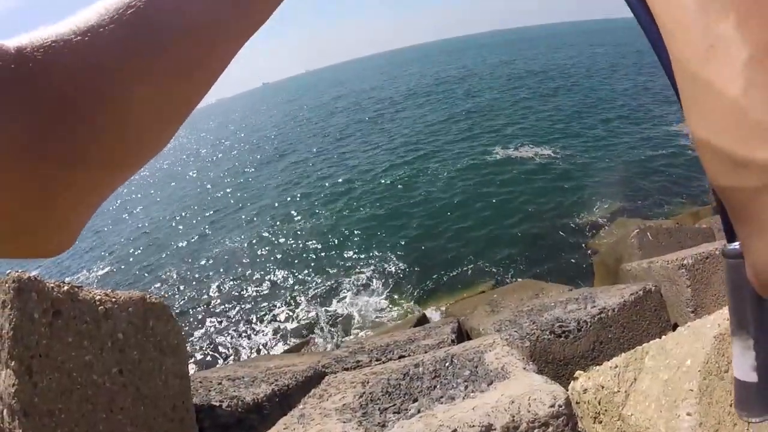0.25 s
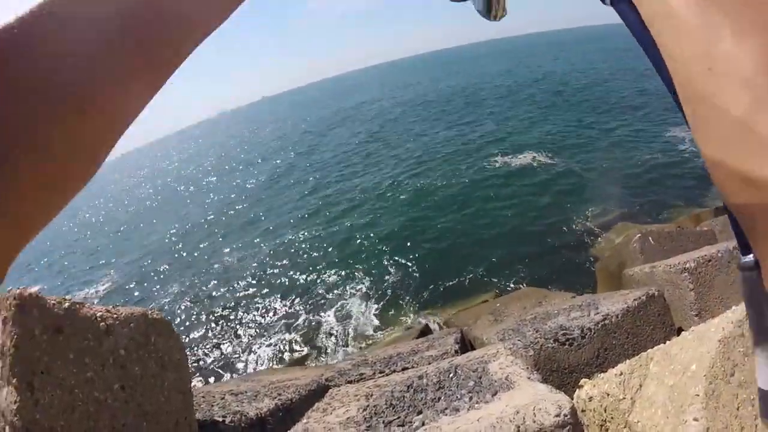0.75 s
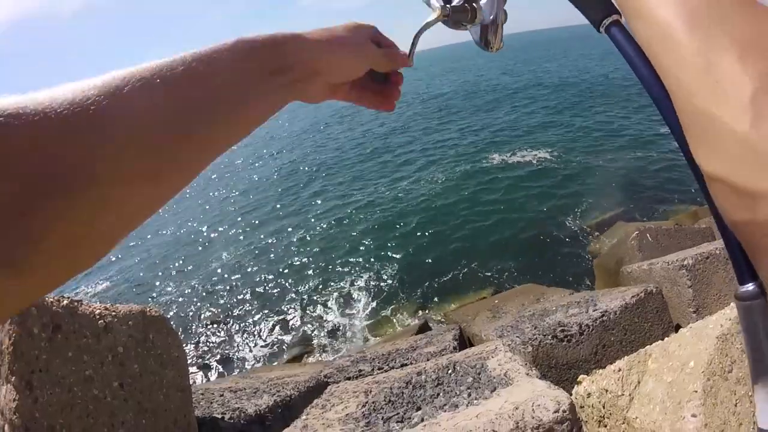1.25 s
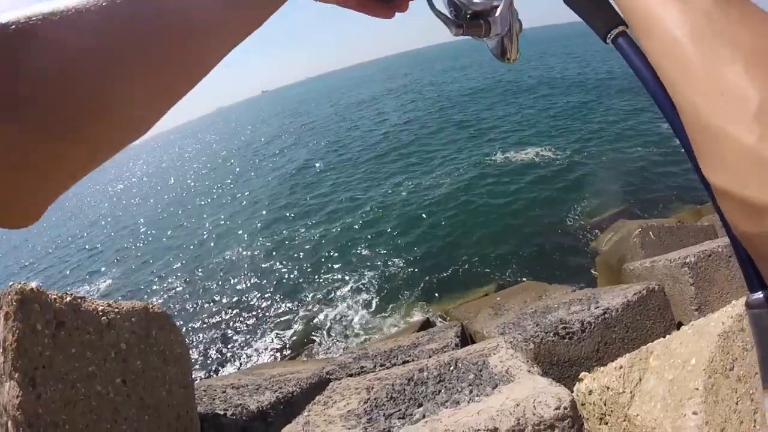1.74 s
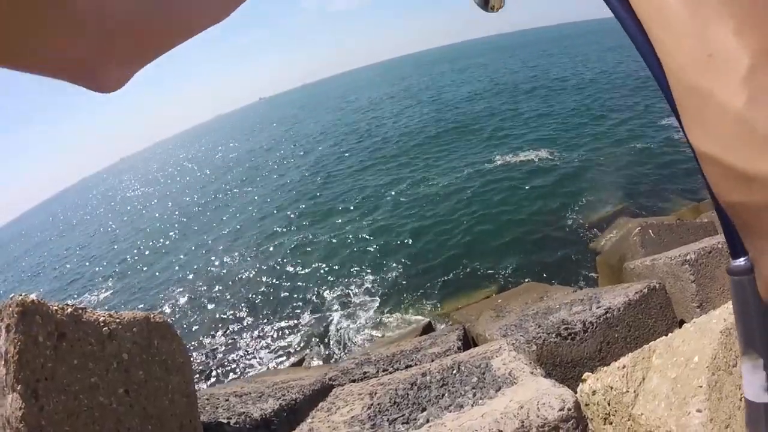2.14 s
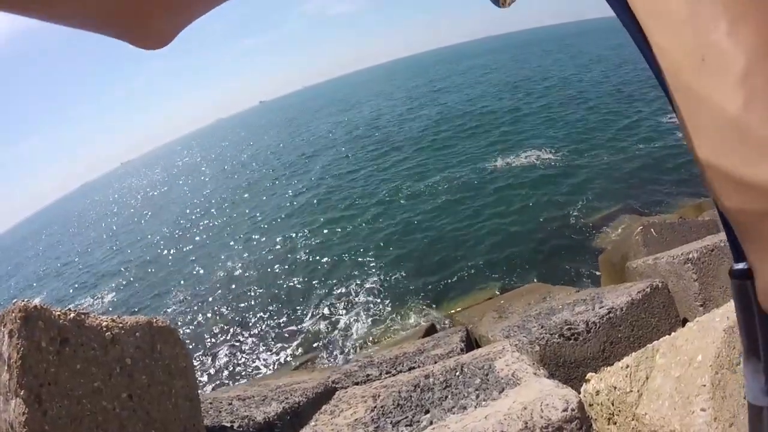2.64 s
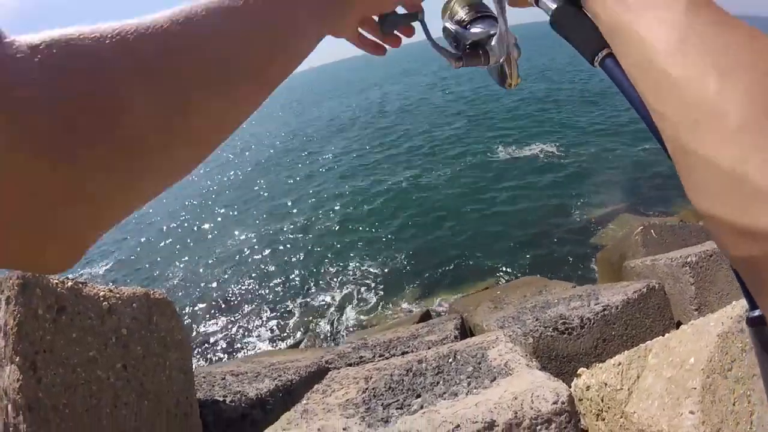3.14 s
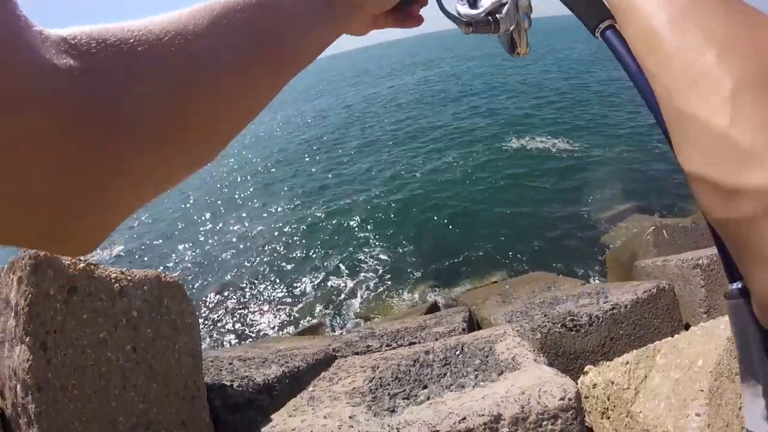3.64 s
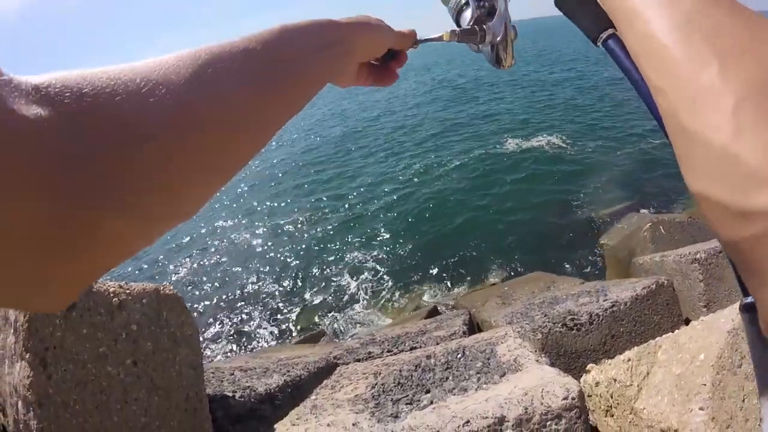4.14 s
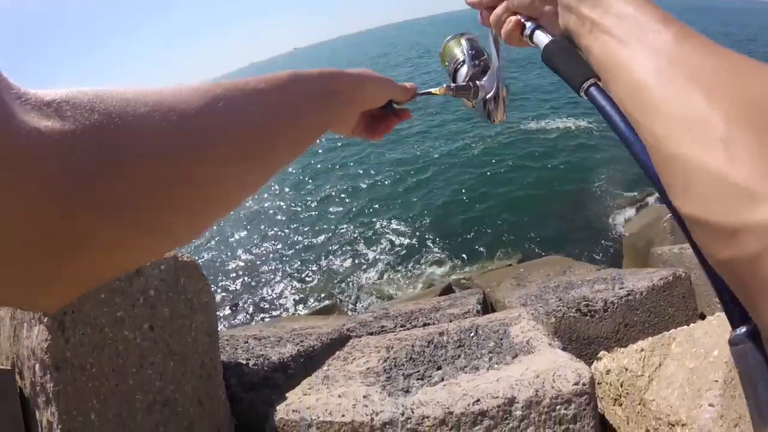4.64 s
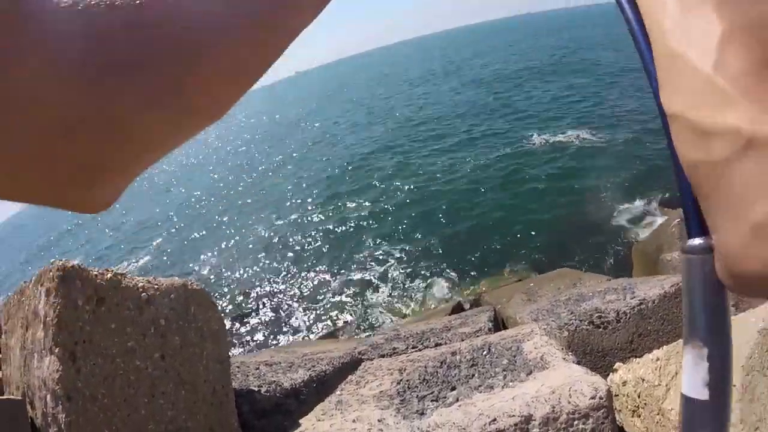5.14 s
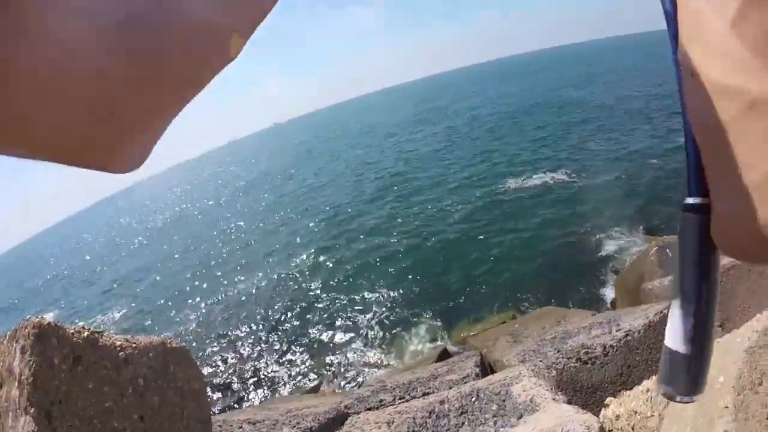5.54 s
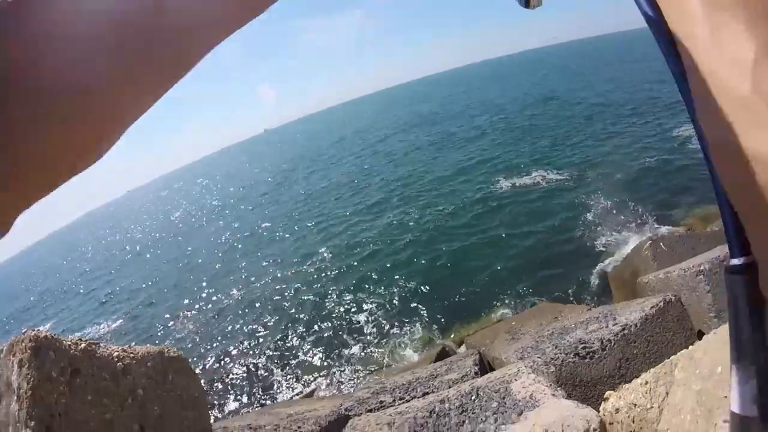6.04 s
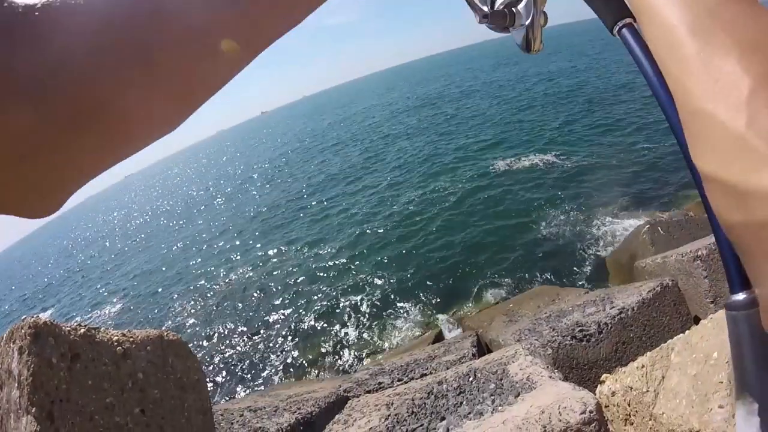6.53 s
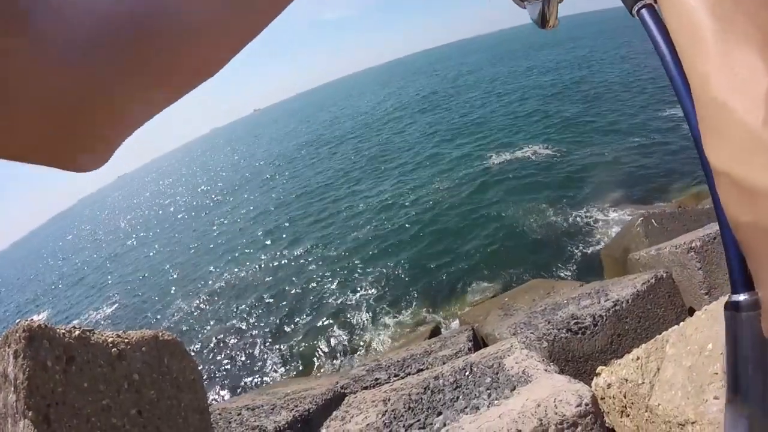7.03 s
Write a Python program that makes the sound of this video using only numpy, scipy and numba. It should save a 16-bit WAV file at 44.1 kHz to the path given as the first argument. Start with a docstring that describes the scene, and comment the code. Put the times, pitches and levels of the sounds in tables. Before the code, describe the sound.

Wavelets splash and slap on concrete, gusts buffet a body-worn microphone, and line pulled from a reel gives dry metallic clicks and brief whirring runs.

```python
"""Swell washes among the concrete blocks of a breakwater: noise and bubble clouds ride a slow swell, with
splashes, slaps, plops, small knocks, spatters and drops on top. Wind buffets a body-worn camera as gust-shaped
low noise. As line is pulled out, the drag of a fishing reel ticks and buzzes: ringing modes and a noise crack
per click. A boat engine drones far away and the camera's electronics whine, both as wavering sines.
The camera case adds resonances to most of the water."""
import sys
import numpy as np
from scipy import signal
from scipy.fft import rfft, irfft
from scipy.io import wavfile
from scipy.ndimage import uniform_filter1d
from numba import njit

SR = 44100
rng = np.random.default_rng(int(sys.argv[2]) if len(sys.argv) > 2 else 0)


def wrap_up_sound(samples):
    """Save the sound to the file named by the first command line argument, as 16-bit audio."""
    columns = np.atleast_2d(samples).T
    # keep every value between -1 and 1, then stretch to whole-number steps
    tamed = np.clip(columns, -1, 1)
    steps = np.round(tamed * 32767).astype(np.int16)
    wavfile.write(sys.argv[1], SR, steps)


N = 321048
TIME = np.arange(N) / SR  # s

# Table levels are starting points: the functions trim, scatter or colour them further.

# slow swell of the wash: [start_s, level_db, gurgle_db and spray_db relative to the wash]
SWELL = [(0, -47, -3, -10.5), (0.35, -49.5, -2, -8.5), (0.65, -48.5, -1, -8.5), (1.25, -52.5, 1.5, -4),
         (1.75, -49.5, -1.5, -7.5), (2.3, -54, 0.5, -8.5), (2.85, -49.5, -3.5, -10.5), (3.2, -50.5, -1, -8),
         (3.8, -49.5, -3, -7.5), (4.5, -47, -3, -8), (4.75, -44, -4, -12.5), (5.08, -46.5, -3, -8),
         (5.38, -47, -2.5, -9.5), (5.58, -45.5, 0.5, -6.5), (6.3, -43, -5.5, -8), (6.7, -45, -0.5, -9),
         (7.28, -45.5, -1, -12.5)]
# wavelets breaking on the blocks: [crest_s, lift_db over the swell, fall_s]
SPLASHES = [(.12, 4, 0.081), (.58, 3, 0.13), (.92, 4, 0.054), (1.5, 0, 0.039), (2.618, 1.5, 0.041),
            (3.03, 4, 0.02), (3.36, 2, 0.087), (3.67, 3.5, 0.067), (4.12, 1.5, 0.038), (4.65, 3, 0.08),
            (4.77, 1, 0.058), (4.939, 4, 0.04), (5.481, 2, 0.068), (6.6, 3.5, 0.11), (6.75, -0.5, 0.029),
            (7.1, 3, 0.044)]
SPLASH_RISE_S = 0.038
# outline of the water's spectrum: [frequency_hz, level_db per Hz]
WATER_SPECTRUM = [(90, 9.5), (250, 3.5), (550, 3.5), (900, 0), (1400, 0), (1650, -7), (2150, -13.5),
                  (3300, -12.5), (4000, -22), (6000, -20.5), (7200, -22), (10500, -31.5), (13200, -36.5),
                  (14500, -58)]
# resonances of the camera case: [centre_hz, width_hz, lift_db]
CASE_RESONANCES = [(1413, 270, 2.5), (1804, 160, 6), (2465, 280, 3.5), (2976, 146, 6), (3540, 194, 5),
                   (4340, 280, 1.5), (5170, 550, 3), (6400, 210, 3)]
# droplets pattering back on the blocks: [start_s, level_db]
PATTER = [(0, -59.5), (2.6, -59), (4.5, -57), (4.95, -57), (5.3, -59.5), (6.05, -72.5), (6.35, -60),
          (6.7, -55), (7.0, -59), (7.28, -59)]
# steady roar of the open sea: [frequency_hz, level_db per Hz]
ROAR_SPECTRUM = [(35, -4.5), (62, 0), (90, -3.5), (130, -6.5), (200, -10.5), (400, -21), (1000, -67)]

# gusts on the microphone: [peak_s, half_length_s, buffet_db, rumble_db]
GUSTS = [(0.0, 0.077, -23, -43), (0.546, 0.055, -12.5, -39), (0.72, 0.1, -19.5, -45),
         (0.945, 0.048, -19, -50), (1.55, 0.067, -31.5, -40), (1.344, 0.12, -19, -39.5),
         (1.91, 0.039, -36, -45), (2.352, 0.06, -28.5, -40.5), (2.543, 0.048, -28.5, -39.5),
         (2.793, 0.043, -32, -36.5), (3.15, 0.047, -27.5, -38), (3.41, 0.11, -20.5, -52),
         (3.989, 0.12, -22, -47), (4.27, 0.14, -27.5, -43.5), (4.67, 0.2, -24, -55),
         (4.967, 0.14, -29, -42.5), (5.743, 0.15, -21.5, -47), (5.939, 0.069, -12.5, -39),
         (6.117, 0.12, -16, -42), (6.34, 0.089, -19, -44), (6.582, 0.11, -33.5, -43),
         (7.06, 0.044, -36, -46)]
BREEZE_DB, RUMBLE_FLOOR_DB = -35, -47.5  # between the gusts
# slow sway of the air: [frequency_hz, level_db per Hz]
SWAY_SPECTRUM = [(5, -19), (9, -11), (12.7, 12.5), (19, -5.5), (30, -33)]
# dull thud riding on the sway: [frequency_hz, level_db per Hz]
THUD_SPECTRUM = [(14, -24), (21, -2), (30, -4.5), (45, -33), (70, -54), (120, -54), (300, -66)]
# rumble of the smaller eddies: [frequency_hz, level_db per Hz]
RUMBLE_SPECTRUM = [(20, -33), (36, -1), (55, -7), (80, -7.5), (120, -27.5), (250, -34), (600, -39.5)]
THUD_DB_PER_OCTAVE = 4.5  # the shorter a gust, the harder it thuds
THUD_HALF_S = 0.1  # half length of a gust whose thud gets no lift

# whine of the camera's electronics: [pitch_hz, level_db]
WHINE = [(9593, -81.5), (9652, -72.5)]

# plops, small knocks and sharp spatters: [start_s, starting pitch_hz, peak_db, t60_s]
PLOPS_AND_KNOCKS = [(0.404, 1280, -38, 0.014), (.580, 3000, -38, 0.016), (1.476, 1360, -33, 0.014),
                    (2.627, 1292, -35, 0.0079), (2.852, 740, -46, .04), (2.908, 598, -43, .06),
                    (3.36, 1360, -39.5, .03), (3.013, 399, -45, 0.062), (3.028, 604, -42, 0.05),
                    (3.044, 810, -43, 0.032), (3.442, 330, -42, 0.037), (3.466, 264, -33.5, 0.067),
                    (3.488, 220, -38, 0.078), (4.028, 1180, -34, 0.014), (4.748, 900, -36, 0.045),
                    (4.93, 3060, -41, 0.015), (6.106, 306, -30, 0.039), (6.3, 415, -39, 0.067),
                    (6.656, 3430, -43, 0.011), (6.749, 1330, -40, 0.027), (7.039, 440, -38, 0.039),
                    (7.074, 1336, -36, 0.034), (7.148, 843, -34.5, 0.033)]

# single drag clicks while the spool slips tooth by tooth: [start_s, crack_db, ring_db, snap_db]
TICKS = [(0.411, -40, -61, -50), (0.4554, -37, -53, -48), (0.4913, -36, -45, -48), (0.5172, -32, -41, -47),
         (0.5402, -41, -54, -55), (0.5606, -39, -51, -53), (0.5771, -41, -56, -46), (0.6075, -44, -61, -56),
         (0.632, -42, -61, -51), (0.6619, -38, -54, -48), (0.6853, -45, -56, -60), (0.7168, -45, -57, -56),
         (0.7517, -41, -56, -57), (0.7826, -36, -53, -58), (0.8395, -39, -51, -58), (0.8744, -41, -53, -51),
         (0.9073, -35, -44, -47), (0.9358, -40, -55, -51), (0.9627, -37, -51, -54), (0.9852, -35, -46, -49),
         (1.0056, -39, -53, -48), (1.0301, -33, -48, -48), (1.063, -38, -45, -54), (1.0889, -27, -50, -58),
         (1.1099, -39, -60, -55), (1.1323, -34, -53, -55), (1.1672, -41, -53, -57), (1.1992, -38, -55, -51),
         (1.5974, -38, -55, -55), (1.9889, -40, -58, -57), (2.2897, -39, -55, -54), (2.6444, -35, -56, -49),
         (3.1263, -39, -52, -55), (3.2176, -46, -60, -62), (3.9828, -40, -58, -55), (4.0412, -46, -55, -66),
         (4.2832, -37, -50, -63), (4.8489, -46, -59, -60), (4.9028, -44, -54, -62), (5.0574, -46, -54, -67),
         (5.1876, -47, -61, -60), (5.3617, -44, -54, -62), (5.5967, -41, -48, -74), (5.7568, -35, -37, -46),
         (5.7927, -34, -41, -55), (5.8371, -40, -52, -63), (6.0222, -37, -50, -48), (6.1, -38, -57, -47),
         (6.5013, -45, -57, -63)]
# runs of drag clicks: [start_s, fastest_s, end_s,
# clicks per s at the start, at the fastest moment, at the end, ring_db, snap_db, crack_db, rattle_db]
# rattle_db is added to snap and crack around the fastest moment
CLICK_RUNS = [(1.217, 1.333, 1.518, 46, 120, 41, -52.5, -54.5, -33, 5),
              (1.608, 1.702, 1.793, 69, 78, 66, -47.5, -61, -34.5, 7),
              (2.876, 2.952, 3.014, 32, 72, 38, -66, -60, -33.5, 1),
              (3.71, 3.773, 3.805, 33, 64, 60, -50.5, -58, -31, 4.5),
              (3.821, 3.862, 3.951, 76, 78, 36, -48, -53, -29, 0),
              (4.11, 4.22, 4.243, 13, 40, 39, -48.5, -57, -38, -3),
              (4.295, 4.379, 4.45, 70, 116, 116, -39.5, -65, -37, 10),
              (4.46, 4.484, 4.522, 89, 108, 89, -36.5, -70, -39, 0),
              (4.528, 4.583, 4.635, 99, 130, 95, -37, -69, -33, 2),
              (4.649, 4.683, 4.767, 50, 59, 10.5, -40.5, -66, -35, 1),
              (5.611, 5.69, 5.731, 22, 55, 55, -48.5, -58, -41, 5),
              (6.216, 6.291, 6.38, 20, 38, 25, -55, -55.5, -32, 6)]
FORCE_DB_PER_OCTAVE = 1.5  # a faster spool strikes the pawl harder
RATTLE_S = 0.02  # half length of the fastest moment of a run
# modes of the reel: [pitch_hz, level_db, t60_s, snap share 0-1; the ring drives the rest]
REEL_MODES = [(4490, 0, 0.0083, 0.57), (5130, 4.5, 0.0038, 0.22), (6650, 8.5, 0.0056, 0.43),
              (7290, 2, 0.017, 0.16), (7390, -2, 0.014, 0.05), (8100, 5.5, 0.0042, 0.8),
              (9640, -5.5, 0.01, 0.77), (12820, 7, 0.0063, 1), (13470, -1, 0.006, 0.95)]
# slow drift of the snap's pitch: [start_s, shift as a fraction]
SNAP_SHIFT = [(.5, 0.019), (1.4, 0.028), (2.0, .004), (3.8, -0.0032), (5.7, 0.015), (6.05, .018),
              (6.3, -0.0012)]
RING_RISE_S, SNAP_RISE_S, SCRAPE_T60_S = 0.0012, 0.0007, 0.0045
RING_DETUNE = 0.003  # random pitch spread, as a fraction
# spectrum of the pawl's crack: [frequency_hz, level_db per Hz]
CRACK_SPECTRUM = [(2500, -25), (3900, -12), (4450, 8), (4750, -1), (5250, 7.5), (6000, -1), (6600, 2),
                  (8600, 6), (11000, -15.5), (12900, -4), (15000, -24)]

# water slapping flat against concrete: [start_s, level_db, t60_s, lowest_hz, highest_hz]
SLAPS = [(0.603, -45, .02, 1600, 2800), (4.123, -41, 0.045, 230, 1100), (4.618, -42, 0.061, 500, 1500),
         (4.775, -38, 0.12, 400, 1397), (4.921, -39.5, 0.13, 400, 3400), (4.98, -46, .16, 1350, 3500),
         (5.468, -38, 0.05, 400, 2100), (6.116, -38, 0.081, 260, 1000), (6.665, -41.5, 0.074, 600, 1900),
         (6.742, -37.5, 0.1, 1210, 1900)]
SLAP_RISE_S = 0.0032

# big drops landing on the concrete: [start_s, level_db, t60_s]
DROPS = [(5.827, -34, 0.0075), (6.133, -48, .014), (6.608, -49, .02), (6.656, -42, .012),
         (6.752, -45, .035), (6.828, -44, .012), (6.919, -42, 0.015), (6.982, -38.5, .009),
         (7.078, -50, .025)]
# spectrum of a drop's splat: [frequency_hz, level_db per Hz]
DROP_SPECTRUM = [(1200, -20), (2400, 3), (3400, 8), (4200, -14), (5300, 0), (6800, -3), (9000, -27),
                 (14000, -35)]

TOP_HZ = 15100  # upper limit of the camera's sound


def undb(db):
    """Decibels to gain."""
    return 10 ** (np.asarray(db) / 20)


def unit(x):
    """Scale to rms 1."""
    return x / np.sqrt(np.mean(x ** 2))


def clock(length_s_inverse):
    """Time axis in seconds for a sound lasting 1 / length_s_inverse s."""
    return np.arange(SR // length_s_inverse) / SR


def decay(t, t60):
    """Exponential decay that falls 60 dB in t60 seconds."""
    return np.exp(-np.log(1000) * t / t60)


def soft_rise(t, rise_s):
    """Onset that starts from rest and builds over about rise_s."""
    return 1 - np.exp(-(t / rise_s) ** 2)


def curves(table):
    """Columns of a (start_s, ..) table, interpolated sample by sample."""
    s, *columns = np.transpose(table)
    return [np.interp(TIME, s, c) for c in columns]


def colour(x, points, peaks=()):
    """Filter by a (frequency_hz, level_db) outline with resonant peaks on top."""
    f = np.maximum(np.arange(len(x) // 2 + 1) * SR / len(x), 1)
    hz, db = np.transpose(points)
    shape = np.interp(np.log(f), np.log(hz), db)
    for centre, width, lift in peaks:
        shape = shape + lift / (1 + (2 * (f - centre) / width) ** 2)
    return irfft(rfft(x) * undb(shape), len(x))


def band(x, lo_hz, hi_hz):
    """Band-pass."""
    return signal.sosfilt(signal.butter(4, [lo_hz, hi_hz], "band", fs=SR, output="sos"), x)


def below(x, hz):
    """Low-pass without delay, so that the rest is the matching high-pass."""
    return signal.sosfiltfilt(signal.butter(2, hz, fs=SR, output="sos"), x)


def walk(rate):
    """Random levels of rms 1, held for 1 / rate s and smoothed twice."""
    hold = int(SR / rate)
    steps = np.repeat(rng.standard_normal(N // hold + 1), hold)
    smooth = uniform_filter1d(uniform_filter1d(steps, hold), hold)
    return unit(smooth[:N])


def add(out, s, sound):
    """Mix a sound in at time s."""
    i = int(np.clip(s * SR, 0, N - 1))
    out[i:i + len(sound)] += sound[:N - i]


@njit
def bubbles(start, hz, cycles, size, rise):
    """Each bubble rings for some cycles and rises in pitch as it nears the surface."""
    out = np.zeros(N)
    for k in range(len(start)):
        n, phase = int(cycles[k] * SR / hz[k]), 0.
        gain, fade = size[k], np.exp(-5 / n)
        for i in range(min(n, N - start[k])):
            phase += 2 * np.pi * hz[k] / SR * (1 + rise * i / n)
            gain *= fade
            out[start[k] + i] += gain * np.sin(phase)
    return out


def froth(count, lo_hz, hi_hz, cycles, spread_db):
    """A cloud of bubbles at random times: small, high ones outnumber large ones, and levels scatter."""
    when, pitch, life, size = rng.random((count, 4)).T
    hz = lo_hz * (hi_hz / lo_hz) ** np.sqrt(pitch)
    scatter_db = spread_db * np.minimum(-np.log(1 - size), 4)
    gain = undb(scatter_db) * hz / np.sqrt(np.sqrt(pitch) + 0.18)  # balances the spectrum
    return bubbles((when * N).astype(np.int64), hz, cycles * (0.5 + life), gain, 0.35)


def splash_lift():
    """Decibels by which breaking wavelets shift the wash: a quick rise and a slower fall."""
    return sum(db * np.exp(-np.maximum((s - TIME) / SPLASH_RISE_S, (TIME - s) / fall_s))
               for s, db, fall_s in SPLASHES)


def sea(foam_db=0, bubble_db=-7, flicker_db=1.14, gurgle_db=-0.87, spray_db=8.5, sea_db=-0.5, lap_db=0.19):
    """Foam hiss and bubbles swell with each wave; low gurgle and high spray vary along with it."""
    swell_db, gurgle, spray = curves(SWELL)
    wash_db = swell_db + splash_lift() + lap_db * walk(9)
    cloud = unit(froth(count=7000, lo_hz=171.7, hi_hz=4945, cycles=12.5, spread_db=1.5))
    foam = undb(foam_db) * rng.standard_normal(N)
    water = colour(foam + undb(bubble_db) * cloud, WATER_SPECTRUM, CASE_RESONANCES)
    water = water / np.std(band(water, 700, 1900))  # the middle of the wash sets its level
    low, not_high = below(water, 830), below(water, 1820)
    low_part = low * undb(gurgle + gurgle_db)
    middle_part = not_high - low
    high_part = (water - not_high) * undb(spray + spray_db)
    # each part flickers on its own
    flickering = sum(part * undb(flicker_db * walk(35)) for part in (low_part, middle_part, high_part))
    return flickering * undb(wash_db + sea_db)


def splashlets(count=260, splashlet_db=-9, t60_s=0.074, rise_s=0.0025, spread_db=1):
    """Little tongues of water tip over all the time: each a sudden pinch of fine bubbles that fades at once."""
    envelope, t = np.zeros(N), clock(5)
    for when, size, life in rng.random((count, 3)):
        pinch = decay(t, t60_s * (0.5 + life)) * (1 - np.exp(-t / rise_s))
        add(envelope, when * N / SR, undb(spread_db * size) * pinch)
    fizz = froth(count=9000, lo_hz=750, hi_hz=3600, cycles=9.4, spread_db=0.5)
    swell_db = curves(SWELL)[0]
    return unit(colour(fizz * envelope, WATER_SPECTRUM, CASE_RESONANCES)) * undb(swell_db + splashlet_db)


def small_plops(small_db=-13.5):
    """Small bubble notes ring out of the wash, following the swell and the breaking wavelets."""
    swell_db = curves(SWELL)[0]
    notes = froth(count=260, lo_hz=271, hi_hz=2477, cycles=27, spread_db=-0.5)
    return unit(colour(notes, WATER_SPECTRUM, CASE_RESONANCES)) * undb(swell_db + splash_lift() + small_db)


def patter():
    """Thrown spray falls back as a fine crackle of droplets, made of very short, high bubble notes."""
    level_db, = curves(PATTER)
    spray = froth(count=30000, lo_hz=2500, hi_hz=10100, cycles=0.74, spread_db=-1.5)
    outline = [(2500, 5.0), (4000, 4.5), (6500, 2.0), (9000, 0.5), (12000, -5), (13800, -10), (15000, -30)]
    return unit(colour(spray, outline, CASE_RESONANCES)) * undb(level_db)


def open_sea_roar():
    """The open sea roars as a steady low noise."""
    noise = rng.standard_normal(N)
    return unit(colour(noise, ROAR_SPECTRUM + [(4000, -100)])) * undb(-48.5)


def even_noise(points, hold_s):
    """Coloured noise evened out over hold_s, so that the gusts alone set its swell."""
    x = colour(rng.standard_normal(N), points + [(3000, -140)])
    return x / np.sqrt(uniform_filter1d(x ** 2, int(hold_s * SR)))


def swells(table):
    """Summed gain of bell-shaped swells, from rows (peak_s, half_length_s, level_db)."""
    return sum(undb(db) * np.exp(-((TIME - s) / half_s) ** 2) for s, half_s, db in table)


def wind(eddy_db=0.5, sway_db=-2, thud_db=-9):
    """Gusts push slowly on the diaphragm, the short ones with a thud; smaller eddies rumble."""
    s, half_s, buffet_db, rumble_db = np.transpose(GUSTS)
    push = np.hypot(undb(BREEZE_DB), swells(zip(s, half_s, buffet_db)))
    sudden_db = THUD_DB_PER_OCTAVE * np.log2(THUD_HALF_S / half_s)
    thud = np.hypot(undb(-30), swells(zip(s, half_s, buffet_db + sudden_db)))
    eddies = undb(RUMBLE_FLOOR_DB + eddy_db * walk(12))
    rumble = np.hypot(eddies, swells(zip(s, half_s, rumble_db)))
    return (even_noise(SWAY_SPECTRUM, 0.084) * push * undb(sway_db)
            + even_noise(THUD_SPECTRUM, 0.0684) * thud * undb(thud_db)
            + even_noise(RUMBLE_SPECTRUM, 0.113) * rumble)


def tone(hz, db, waver_db, drift_hz):
    """A sine that wavers slightly in level and pitch."""
    phase = 2 * np.pi * np.cumsum(hz + drift_hz * walk(6)) / SR
    return np.sqrt(2) * np.sin(phase) * undb(db + waver_db * walk(2.9))


def boat_engine():
    """A distant engine drones on one low, wavering note."""
    return tone(hz=73.16, db=-53.5, waver_db=2.5, drift_hz=0.77)


def camera_whine():
    """The camera's electronics whine on faint, high lines."""
    return sum(tone(hz, db, waver_db=-0.5, drift_hz=2.66) for hz, db in WHINE)


def plops_and_knocks(rise=0.8, glug_hz=800, splat=0.33, attack_s=0.00019, plop_db=1):
    """Plops, small knocks and sharp spatters: a short note with a splat of noise; low ones glide up."""
    out, t = np.zeros(N), clock(5)
    for s, hz, db, t60 in PLOPS_AND_KNOCKS:
        glide = rise / (1 + (hz / glug_hz) ** 4)
        note = np.sin(2 * np.pi * hz * t * (1 + glide * t / t60 / 2))
        noise = unit(band(rng.standard_normal(len(t)), hz * 0.39, hz * 1.2))
        body = (note + splat * noise) / (1 + splat)
        envelope = decay(t, t60) * (1 - np.exp(-t / (attack_s + t60 / 10)))
        add(out, s, undb(db + plop_db) * envelope / envelope.max() * body)
    return out


def drag_clicks(scatter_db=2.4):
    """Rows (start_s, crack_db, ring_db, snap_db): single clicks, and the clicks of each run at its changing rate."""
    rows = list(TICKS)
    for start, fastest, end, first, top, last, ring_db, snap_db, crack_db, rattle_db in CLICK_RUNS:
        t = np.arange(start, end, 1 / SR)
        rate = np.interp(t, [start, fastest, end], [first, top, last])
        teeth = np.cumsum(rate) / SR  # teeth passed so far
        tooth_marks = np.linspace(0, teeth[-1], int(np.round(teeth[-1])) + 1)
        times = np.interp(tooth_marks, teeth, t)
        speed_db = FORCE_DB_PER_OCTAVE * np.log2(np.interp(times, t, rate) / top)
        force = speed_db + scatter_db * rng.standard_normal(len(times))
        rattle = force + rattle_db * np.exp(-((times - fastest) / RATTLE_S) ** 2)
        rows += zip(times, crack_db + rattle, ring_db + force, snap_db + rattle)
    return rows


def reel(clicks, reel_db=6.5, snap_detune=0.015, mode_scatter_db=2.0, damping_scatter=0.38):
    """The pawl snaps off each tooth of the drag; the clicker's ring builds just after, always near the same pitch."""
    out, t = np.zeros(N), clock(25)
    hz, mode_db, t60, share = np.transpose(REEL_MODES)[:, :, None]
    share = np.clip(share, 0, 1)
    rise_s = RING_RISE_S * (1 - share) + SNAP_RISE_S * share
    for s, _, ring_db, snap_db in clicks:
        pitch, force, grip = rng.standard_normal((3, len(hz), 1))
        # every blow shares itself differently among the modes
        drive_db = (1 - share) * ring_db + share * snap_db
        db = mode_db + drive_db + mode_scatter_db * force * (0.5 + share)
        # the pawl damps the modes differently as it lands
        damped_t60 = t60 / np.exp(damping_scatter * grip)
        envelope = decay(t, damped_t60) * soft_rise(t, rise_s)
        drift = share * np.interp(s, *np.transpose(SNAP_SHIFT))
        shift = drift + (RING_DETUNE + snap_detune * share) * pitch
        modes = undb(db + reel_db) * envelope * np.sin(2 * np.pi * hz * (1 + shift) * t)
        add(out, s, np.sum(modes, axis=0))
    return out


def cracks(clicks, crack_db=1):
    """The pawl scrapes over the edge of each tooth: a short, rough, broad crack, different every time."""
    blows, t = np.zeros(N), clock(50)
    envelope = decay(t, SCRAPE_T60_S) * soft_rise(t, SNAP_RISE_S)
    for s, db, _, _ in clicks:
        scrape = envelope * rng.standard_normal(len(t))
        add(blows, s, undb(db + crack_db) * scrape / np.linalg.norm(scrape))
    return colour(blows, CRACK_SPECTRUM)


def slaps(slap_db=0, fizz_db=-3):
    """A slap traps a burst of bubbles that dies away quickly."""
    out, t = np.zeros(N), clock(4)
    cloud = unit(froth(count=9000, lo_hz=225, hi_hz=3550, cycles=8.3, spread_db=0.0))
    fizz = undb(fizz_db) * rng.standard_normal(N)
    burst = colour(cloud + fizz, WATER_SPECTRUM, CASE_RESONANCES)
    for s, db, t60, lo_hz, hi_hz in SLAPS:
        envelope = decay(t, t60) * soft_rise(t, SLAP_RISE_S)
        grains = unit(band(burst[int(s * SR):][:len(t)], lo_hz, hi_hz))
        add(out, s, undb(db + slap_db) * envelope / envelope.max() * grains)
    return out


def drops(drop_db=0, attack_s=0.00026):
    """A big drop bursts on the concrete with a short, bright tick of noise."""
    out, t = np.zeros(N), clock(20)
    for s, db, t60 in DROPS:
        envelope = decay(t, t60) * (1 - np.exp(-t / attack_s))
        splat = unit(colour(rng.standard_normal(len(t)), DROP_SPECTRUM, CASE_RESONANCES))
        add(out, s, undb(db + drop_db) * envelope / envelope.max() * splat)
    return out


def scene():
    """Sea, wind and reel, with a distant engine and the camera's whine."""
    wash = sea() + splashlets() + small_plops() + patter() + open_sea_roar()
    water = wash + plops_and_knocks() + slaps() + drops()
    clicks = drag_clicks()
    drag = reel(clicks) + cracks(clicks)
    return (water + wind() + boat_engine() + camera_whine() + drag)[None]


def record(dry):
    """The camera cuts the top with a steep low-pass."""
    return signal.sosfilt(signal.ellip(8, 0.2, 70, TOP_HZ, fs=SR, output="sos"), dry)


dry = scene()
out = record(dry)
wrap_up_sound(out)
```